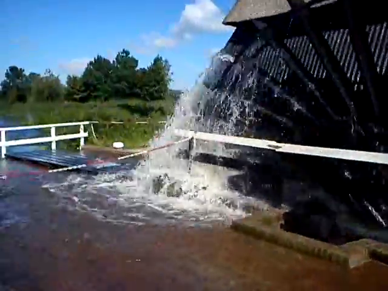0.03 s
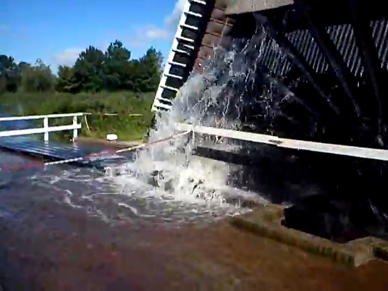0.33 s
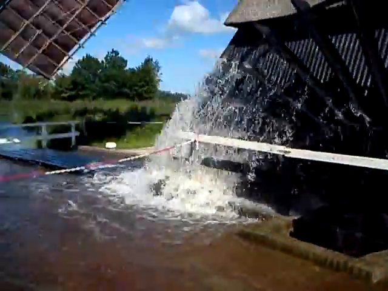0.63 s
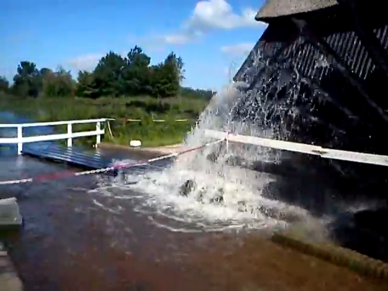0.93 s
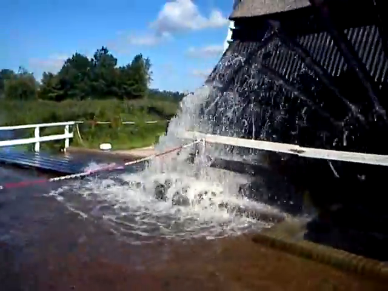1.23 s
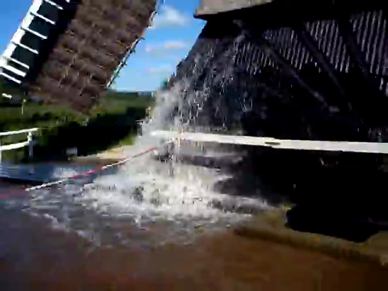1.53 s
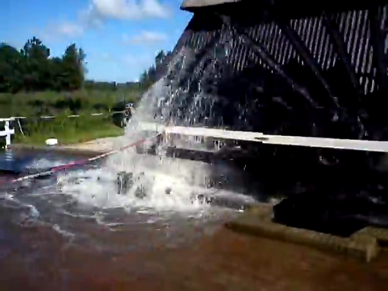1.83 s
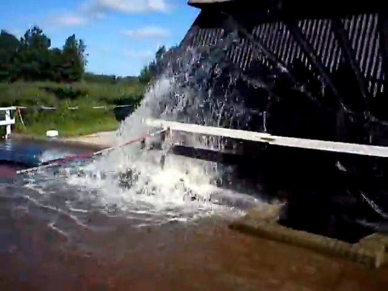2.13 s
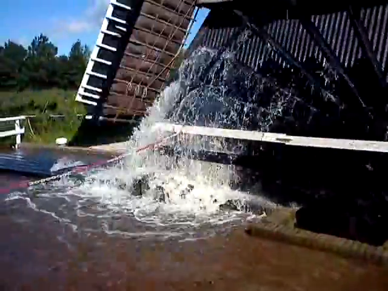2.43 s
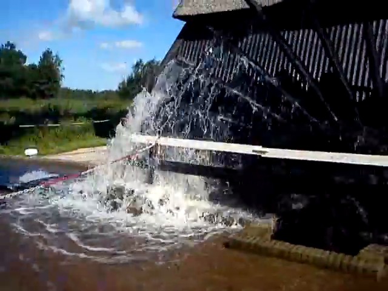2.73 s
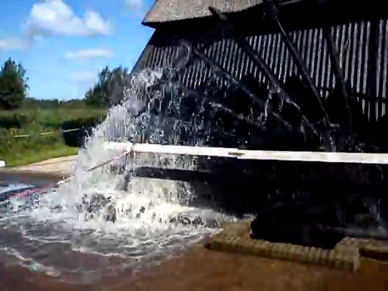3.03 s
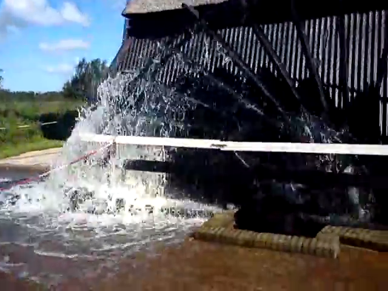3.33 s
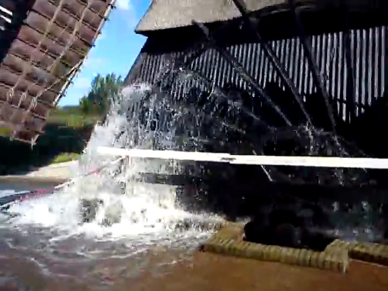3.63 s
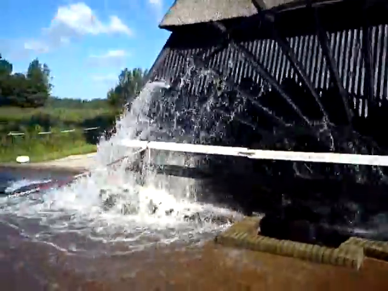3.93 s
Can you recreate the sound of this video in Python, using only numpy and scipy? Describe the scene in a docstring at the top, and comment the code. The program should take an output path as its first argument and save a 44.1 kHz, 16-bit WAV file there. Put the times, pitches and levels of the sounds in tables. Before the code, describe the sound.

Rushing, splashing water falls from a mill wheel as wind gusts thump the microphone.

```python
"""Water pours off a mill wheel into a pool: a rush of bubbles, churning foam and fine spray over a
low rumble. Each bubble rings as a damped oscillator, the smaller the higher; late on, the pour
turns hollow and gurgles. Wind puffs boom and knock against the one microphone of a small camera,
which keeps only a narrow band and ticks as the strongest gust overloads it."""
import sys
import numpy as np
from scipy.fft import rfft, irfft, next_fast_len
from scipy.io import wavfile
from scipy.ndimage import uniform_filter1d, map_coordinates

SR = 44100
rng = np.random.default_rng(int(sys.argv[2]) if len(sys.argv) > 2 else 0)


def file_out(sig):
    """Save sig as 16-bit WAV at sys.argv[1]."""
    # one column per channel
    cols = np.atleast_2d(sig).T
    # limit, then scale
    lim = np.clip(cols, -1, 1)
    pcm = np.round(lim * 32767).astype(np.int16)
    wavfile.write(sys.argv[1], SR, pcm)


N = 176400

# Band levels of the falling water: t/s, then level/dB of plunge, churn, splash, spray
WATER_LEVELS = [(0, -26.5, -26.5, -29, -21), (0.4, -24, -26, -27, -24), (0.68, -22, -24.5, -24, -22),
                (0.86, -30, -34.5, -33, -27), (1.05, -27, -33, -26.5, -25.5),
                (1.28, -26, -30, -26.8, -22.5), (1.6, -26.5, -27, -27, -24), (1.72, -30.5, -32.5, -31, -30),
                (1.88, -27.5, -27.5, -32, -27.5), (2.02, -28, -30, -31.5, -25.5),
                (2.45, -25, -27.1, -26.0, -24.5), (2.62, -22.5, -25, -27, -23.0),
                (2.8, -25.5, -27.5, -25.5, -21.5), (2.97, -29, -28, -34, -28.5),
                (3.17, -25.5, -23.5, -29.5, -26), (3.45, -24.5, -24, -29, -23.5),
                (3.66, -21, -23, -28, -23.5), (4, -26, -22.5, -26.5, -23)]
# Spectral density of each band: f/Hz, level/dB
PLUNGE_SPECTRUM = [(250, -24), (500, -5.5), (680, -1), (900, 4.5), (1150, 6), (1400, 4), (2200, -64.5)]
CHURN_SPECTRUM = [(800, -34.5), (1150, -15.5), (1400, 2), (1630, 4.5), (1850, 0.5), (2150, -6.5),
                  (3000, -56)]
SPLASH_SPECTRUM = [(1300, -46.5), (1750, -2.5), (2000, 0), (2400, 2.5), (2700, -3), (3000, -4), (3600, -18),
                   (4500, -64)]
SPRAY_SPECTRUM = [(2000, -37), (2600, -4), (2950, -4.5), (3120, -3.5), (3280, 0.5), (3470, -3.5),
                  (3650, -10), (3950, -20.5), (4300, -28), (4600, -48), (4800, -65.5)]

def cascade(hollow_start_s=3.0, hollow_rise_s=0.22, hollow_share=0.41):
    """Bubble resonance: large bubbles ring low in the plunge; foam, splash and spray sound higher."""
    plunge_db, churn_db, splash_db, spray_db = curves(WATER_LEVELS)
    plunge = water(PLUNGE_SPECTRUM, bubbles(835, 16, 2.9, count=2000), -1.5, 1.03, flutter_rate=20)
    churn = water(CHURN_SPECTRUM, bubbles(1550, 32, 2.4, count=1500), -1.5, 1.2, flutter_rate=35)
    splash = water(SPLASH_SPECTRUM, bubbles(2400, 47, 2.1, count=2000), -2, 1.47, flutter_rate=120)
    spray_gain = amp(spray_db + 0.1 + 0.46 * wobble(14))
    fine_bubbles = bubbles(3300, 32, 3.35, count=2500, scatter=.15)
    spray = water(SPRAY_SPECTRUM, fine_bubbles, -1, 1, flutter_rate=110)
    lows = amp(plunge_db - 0.3) * plunge + amp(churn_db - 0.63) * churn
    highs = amp(splash_db - 0.65) * splash + spray_gain * spray
    gurgle = amp(churn_db + 1.5) * hollow_pour()
    # the gurgle takes over part of the two lower bands
    share = hollow_share * np.clip((np.arange(N) / SR - hollow_start_s) / hollow_rise_s, 0, 1)
    return np.sqrt(1 - share) * lows + np.sqrt(share) * gurgle + highs


def water(spectrum, rings, rings_db, flutter_db, flutter_rate):
    """Incoherent addition: single bubbles over a wash of countless others, fluttering as clumps land."""
    wash = coloured(rng.standard_normal(N), spectrum)
    mix = wash + amp(rings_db) * coloured(rings, spectrum)
    return unit(mix * amp(flutter_db * wobble(flutter_rate)))


def bubbles(centre_hz, cycles, spread_db, count, chirp=0.081, scatter=0.33):
    """Damped oscillation: each bubble rings briefly, rising in pitch; a few are much louder."""
    onset = rng.random((count, 1))
    hz = centre_hz * np.exp(scatter * rng.standard_normal((count, 1)))
    size = np.minimum(rng.exponential(size=(count, 1)), 4)
    t = np.arange(SR // 50) / SR
    age = t * hz / cycles  # 1 after a decay of 60 dB
    ring = amp(spread_db * size - 60 * age) * np.sin(2 * np.pi * hz * t * (1 + chirp * age))
    at = (onset * N).astype(int) + np.arange(len(t))
    return np.bincount(at.ravel(), ring.ravel())[:N]


# Resonances of the hollow pour: f/Hz, bandwidth/Hz, level/dB
HOLLOW_MODES = [(690, 130, -1), (1433, 210, 0), (1612, 200, 0.5)]

def hollow_pour():
    """Resonant filtering: heavily damped bubbles gurgle through three broad resonances."""
    def response(f):
        return sum(amp(db) / (1 + (2 * (f - hz) / width) ** 2) for hz, width, db in HOLLOW_MODES)
    return unit(filtered(bubbles(1300, 2.7, 2, count=5000, scatter=.5), response))


# Spectral density of the pool's rumble: f/Hz, level/dB
RUMBLE_SPECTRUM = [(20, -39.5), (50, -17), (80, -7), (125, 4), (200, -2.5), (370, -2), (520, -11),
                   (800, -19), (2000, -63.5)]

def pool(level_db=-26):
    """Low-frequency random noise: water driven under the surface rumbles steadily."""
    return amp(level_db + 1.2 * wobble(25)) * coloured(rng.standard_normal(N), RUMBLE_SPECTRUM)


# Wind puffs, and sharp buffets that knock into the midrange: t/s, duration/s, level/dB
WIND_PUFFS = [(0.024, 0.059, -23.5), (0.117, 0.024, -15.5), (0.514, 0.09, -17), (0.589, 0.03, -15.5),
              (0.681, .035, -13.5), (0.708, .032, -8.5), (0.777, 0.014, -15.5), (0.809, 0.033, -13.5),
              (0.888, .045, -16), (1.216, 0.016, -15), (1.362, 0.033, -16), (1.485, 0.012, -18.5),
              (1.582, 0.018, -15.5), (1.652, 0.038, -15.5), (1.70, 0.029, -14), (1.742, 0.013, -14),
              (1.816, 0.019, -18.5), (1.869, 0.0075, -19), (1.917, .025, -13), (1.965, .03, -16),
              (2.011, 0.046, -13), (2.117, 0.015, -17), (2.293, 0.017, -21), (2.495, 0.03, -20),
              (2.809, 0.014, -15.5), (2.858, 0.019, -11.5), (2.99, 0.043, -15.5), (3.316, 0.04, -16),
              (3.373, 0.012, -23.5), (3.544, 0.019, -17), (3.679, 0.02, -18.5)]
WIND_KNOCKS = [(.692, 0.018, -20), (.732, 0.015, -16.5), (1.645, 0.012, -18), (1.745, 0.016, -21),
               (2.025, 0.016, -21), (2.853, 0.012, -26.5), (2.975, 0.027, -22.5), (3.32, 0.031, -25)]
# Spectral density of the eddies and of the knocks: f/Hz, level/dB
EDDY_SPECTRUM = [(20, -50), (50, -21), (80, -29), (110, -12.5), (138, 3), (180, -3), (260, -8), (420, -17),
                 (600, -32.5), (1200, -37), (3000, -71.5)]
KNOCK_SPECTRUM = [(150, -16), (280, 2), (430, 1), (650, -8.5), (1200, -13.5), (2500, -46)]

def wind(breeze_db=-34, boom_hz=146.2, evenness=0.58):
    """Turbulent pressure on the microphone: puffs boom and knock amid eddies; a breeze fills the gaps."""
    t = np.arange(N) / SR
    eddies = coloured(rng.standard_normal(N), EDDY_SPECTRUM)
    swell = np.sqrt(np.abs(uniform_filter1d(eddies ** 2, size=900)) + 1e-6)  # running rms
    force = np.hypot(amp(-2) * buffets(WIND_PUFFS), amp(breeze_db + 4 * wobble(16)))
    knocks = buffets(WIND_KNOCKS) * coloured(rng.standard_normal(N), KNOCK_SPECTRUM)
    pressure = force * unit(eddies / swell ** evenness) + knocks
    for s, length, db in WIND_PUFFS:
        detune, phase = rng.standard_normal(2)
        hz = boom_hz * np.exp(.14 * detune)
        boom = np.sqrt(2) * np.sin(2 * np.pi * (hz * (t - s) + phase))
        pressure += amp(db - 6) * bump(s, length) * boom
    return pressure


# Overloads in the strongest gust: t/s, level/dB before filtering
OVERLOADS = [(.690, -20), (.70, -42.5), (.713, -23), (0.72, -30), (.732, -31), (.798, -23)]
# Frequency response that shapes each tick: f/Hz, gain/dB
TICK_RESPONSE = [(1000, -6.5), (4000, 10), (6000, 10.5), (10000, -0.5), (16000, -12)]

def overload_ticks(mean_gap_s=0.0013, end_db=-8):
    """Impulse response: a microphone overload begins with a thin click and ends with a weaker one."""
    impulses = np.zeros(N)
    for s, db in OVERLOADS:
        end_s = s + mean_gap_s * (.5 + rng.random())
        impulses[round(s * SR)] += amp(db)
        impulses[round(end_s * SR)] -= amp(db + end_db)
    f, db = np.transpose(TICK_RESPONSE)
    return filtered(impulses, lambda hz: amp(np.interp(hz, f, db)))


def buffets(rows):
    """Addition of powers: the joint envelope of overlapping gusts."""
    return np.sqrt(sum((amp(db) * bump(s, length)) ** 2 for s, length, db in rows))


def bump(s, length):
    """Gaussian envelope centred on time s, length seconds wide at half power."""
    return np.sqrt(.5) ** ((2 * (np.arange(N) / SR - s) / length) ** 2)


def wobble(rate):
    """Random modulation: a smooth curve with rate knots a second."""
    return map_coordinates(rng.standard_normal(4096), [np.arange(N) * rate / SR], mode="wrap")


def curves(rows):
    """Linear interpolation: one value per sample for each column after the time."""
    s, *columns = np.transpose(rows)
    return [np.interp(np.arange(N) / SR, s, column) for column in columns]


def coloured(x, spectrum):
    """Spectral shaping by (f/Hz, level/dB) points on a log frequency axis, at rms 1."""
    f, db = np.transpose(spectrum)
    return unit(filtered(x, lambda hz: amp(np.interp(np.log(hz + 1), np.log(f), db))))


def filtered(x, response):
    """Linear filtering: the spectrum of x times a frequency response."""
    size = next_fast_len(N + SR // 2)
    return irfft(rfft(x, size) * response(np.fft.rfftfreq(size, 1 / SR)), size)[:N]


def amp(db):
    """Amplitude ratio of a level in decibels."""
    return 10 ** (np.asarray(db) / 20)


def unit(x):
    """Normalisation to rms 1."""
    return x / np.sqrt(np.mean(x ** 2) + 1e-20)


def scene():
    """Superposition: water and wind add at one microphone."""
    return (cascade() + pool() + wind())[None]


def record(dry, ceiling=.75, band_hz=4700, top_hz=16000):
    """Saturation and band limiting: the camera rounds off peaks; only ticks reach above its band."""
    rounded = dry[0] / (1 + np.abs(dry[0] / ceiling) ** 8) ** (1 / 8)
    narrow = filtered(rounded, lambda hz: hz < band_hz)
    return filtered(narrow + overload_ticks(), lambda hz: hz < top_hz)[None]


dry = scene()
out = record(dry)
file_out(out)
```